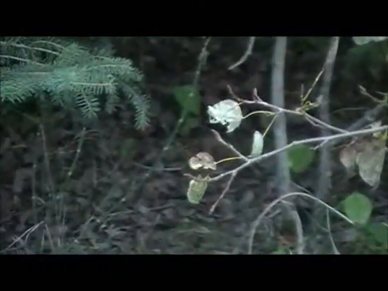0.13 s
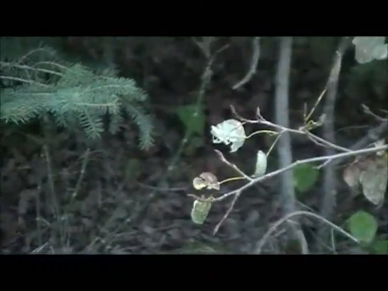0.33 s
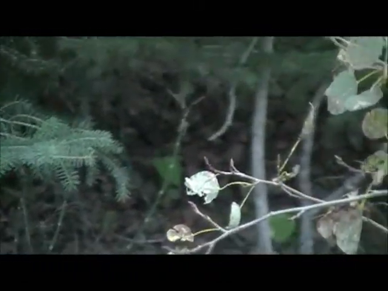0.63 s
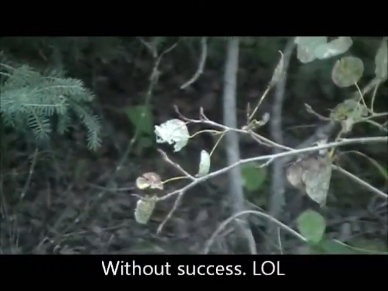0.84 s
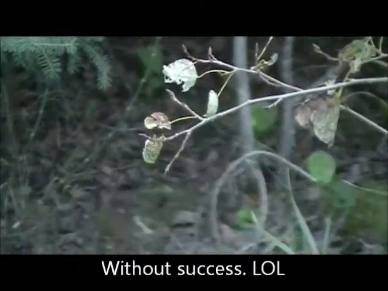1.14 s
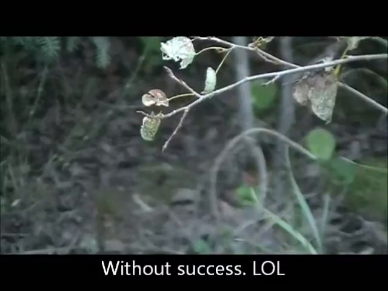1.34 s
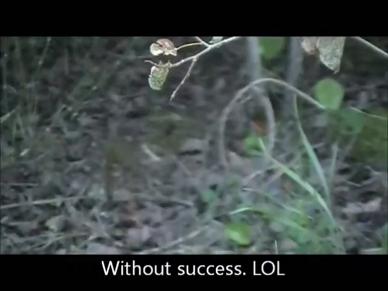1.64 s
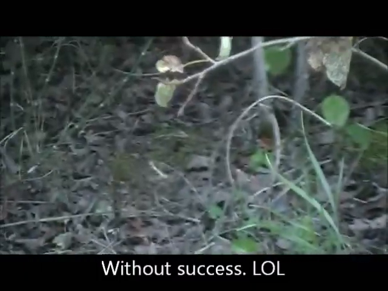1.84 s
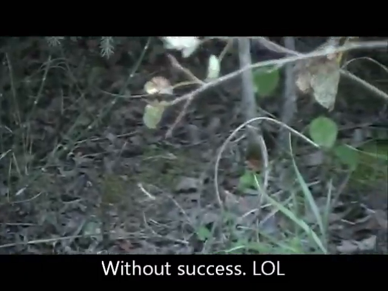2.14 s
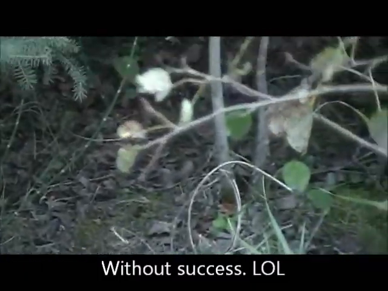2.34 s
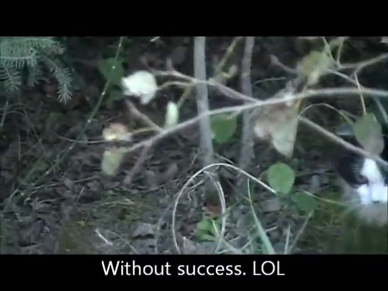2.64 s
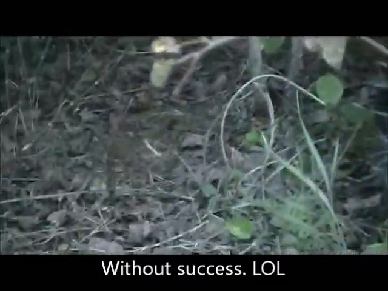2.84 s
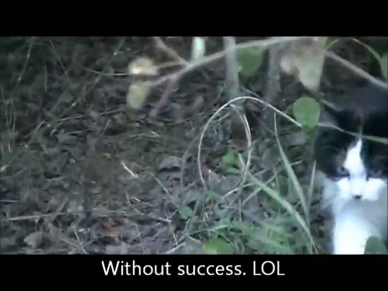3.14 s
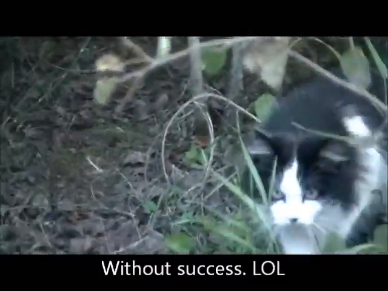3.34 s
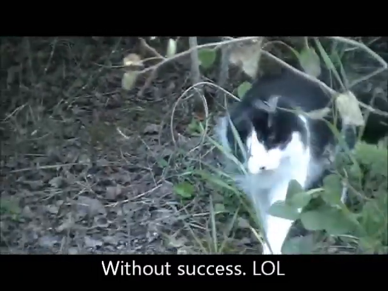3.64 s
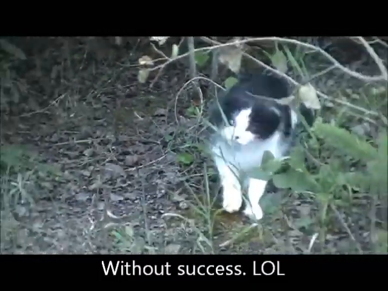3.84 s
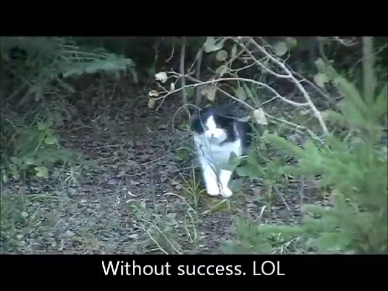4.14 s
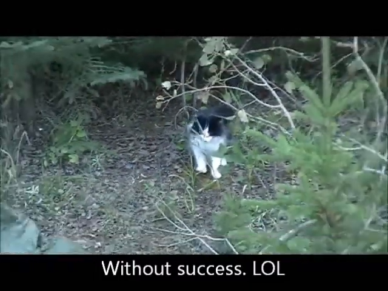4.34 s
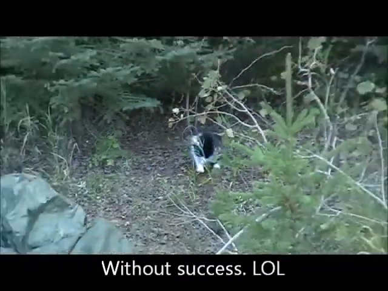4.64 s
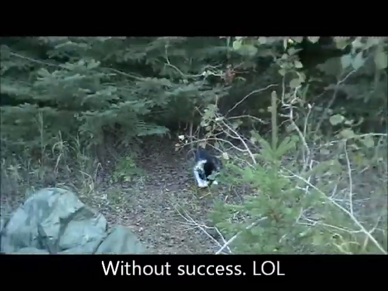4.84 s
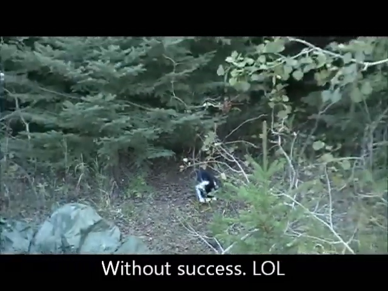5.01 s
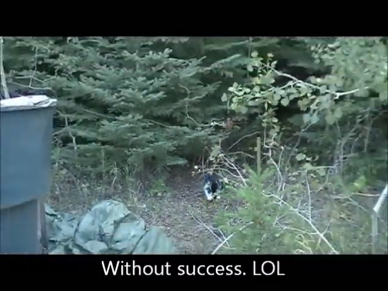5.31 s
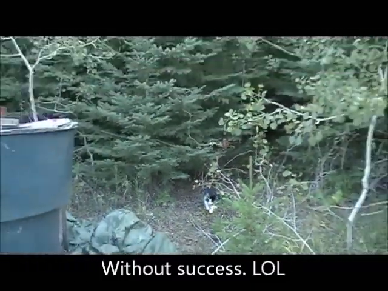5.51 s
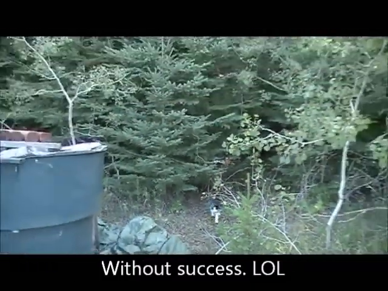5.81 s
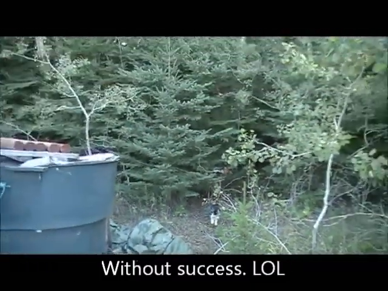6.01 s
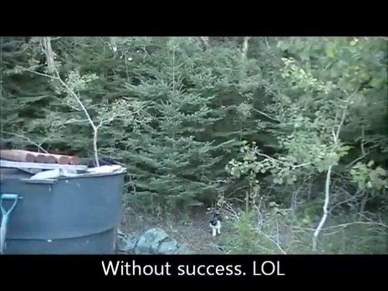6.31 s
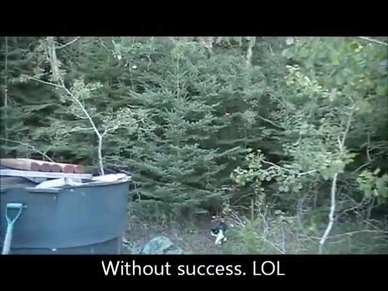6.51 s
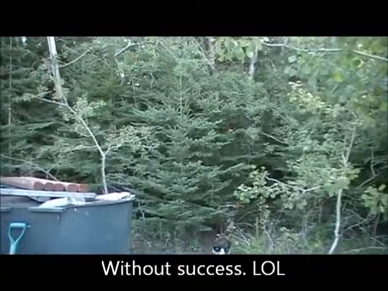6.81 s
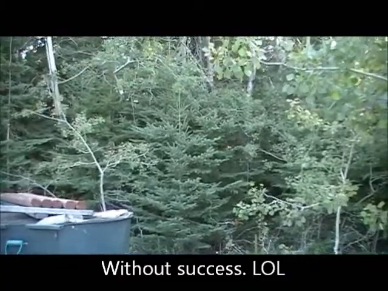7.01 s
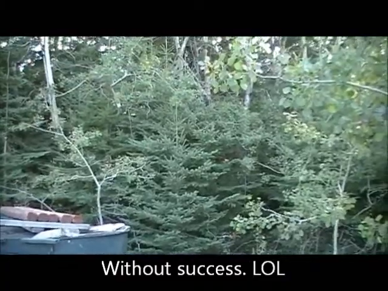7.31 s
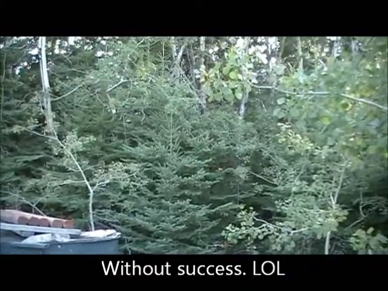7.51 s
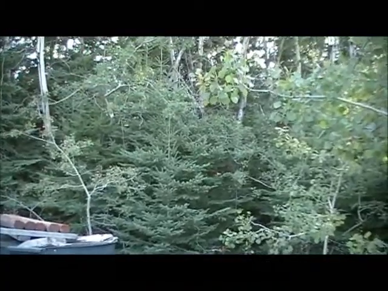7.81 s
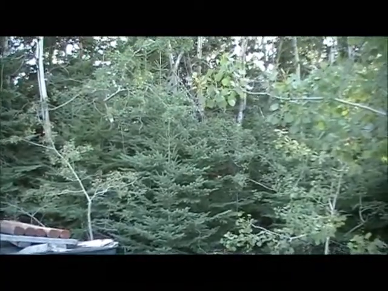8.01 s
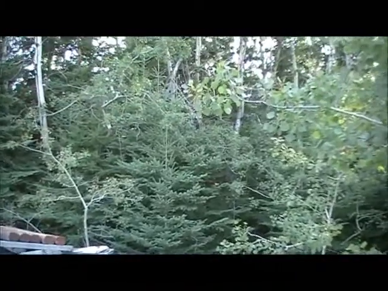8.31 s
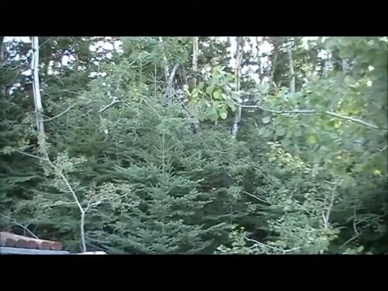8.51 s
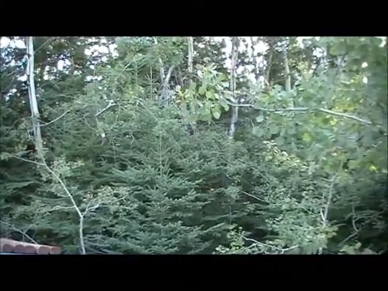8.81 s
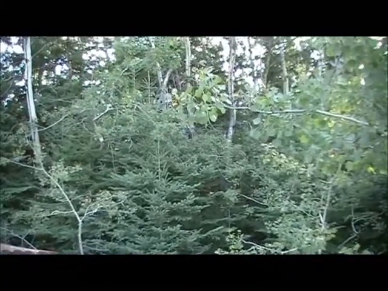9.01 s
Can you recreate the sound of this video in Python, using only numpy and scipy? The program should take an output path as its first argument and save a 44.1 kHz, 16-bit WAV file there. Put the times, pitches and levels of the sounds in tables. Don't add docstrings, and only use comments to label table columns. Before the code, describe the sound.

At 0 s a sharp plastic knock and leaf brush hit the handheld camera. A squirrel immediately begins scolding, somewhat echoey: hoarse, breathy barks alternate with very short high chirps, about five or six calls a second, until 2.8 s. From 3.0 s the calls become longer and more excited, with a clear whistle, raspy squeaks, then a run of piercing arched whistles from 4.0 to 4.9 s. Twigs tick around 3.2 and 4.3 s, and a very faint zoom motor hums from 3.8 to 6 s, stepping upward. From 5.1 s barks and chirps alternate again, drier and closer, to the end. A strong case knock lands at 7.2 s, followed by another long whistle. After 8.2 s twigs tick and leaves rustle, with a softer knock at 8.7 s. Short trunk echoes and wide, gently gusting leaf hiss continue throughout.

```python
import sys
import numpy as np
from scipy import signal
from scipy.io import wavfile
from scipy.ndimage import uniform_filter1d

SR = 44100
rng = np.random.default_rng(int(sys.argv[2]) if len(sys.argv) > 2 else 0)


def rack_gain(trim_db):
    fader = np.asarray(trim_db, float)
    return 10 ** (fader / 20)


def unload_wav(signal):
    wavfile.write(
        sys.argv[1],
        SR,
        np.round(np.clip(np.atleast_2d(signal).T, -1, 1) * 32767).astype(np.int16),
    )


N = 403515

# time of the pitch jump in seconds, whistle level in dB, top pitch in Hz,
# hold in seconds, voiced lead-in in seconds.
CHIRPS = [(0.2753, -34, 5170, 0.023, 0.0084), (0.618, -34, 5420, 0.024, 0.0052),
          (0.801, -33, 5470, 0.022, 0.0093), (1.148, -53, 5546, 0.025, 0.0036),
          (1.508, -37, 4710, 0.014, 0.012), (1.8224, -34, 5586, 0.034, 0.0051),
          (2.16, -43, 5520, 0.031, 0.0092), (2.376, -24.5, 5700, 0.021, 0.0034),
          (2.774, -28.5, 5810, 0.034, 0.004), (5.109, -37, 5570, 0.024, 0.0072),
          (5.937, -56, 5384, 0.032, 0.0091), (6.141, -26, 5625, 0.04, 0.006),
          (6.519, -48, 5450, 0.03, 0.0069), (6.696, -24.5, 5500, 0.022, 0.0045),
          (7.053, -25.5, 5556, 0.035, 0.0062), (7.631, -66, 5240, 0.018, 0.0095),
          (7.8125, -42, 5590, 0.032, 0.0063), (8.172, -56, 5434, 0.027, 0.009),
          (8.3685, -37, 5430, 0.024, 0.0087), (8.529, -56, 5375, 0.018, 0.012),
          (8.849, -64, 5360, 0.021, 0.009)]
LINGERING_CHIRPS = [
    (5.2845, -40, 5380, 0.016, 0.009),
]
# time of the pitch jump in seconds, whistle level in dB, top pitch in Hz,
# hold in seconds, voice level in dB.
WHISTLES = [
    (3.469, -50, 5966, 0.058, -41),
    (3.735, -49, 4930, 0.032, -41.5),
    (4.0167, -22.5, 5890, 0.05, -54),
    (4.309, -17.5, 5874, 0.057, -57),
    (4.627, -22, 5862, 0.077, -44.5),
    (4.882, -22, 5785, 0.052, -39),
    (7.265, -30, 5726, 0.055, -38.5),
]
RESUMED_WHISTLES = [
    (3.047, -24.5, 6097, 0.085, -45),
    (3.199, -57, 5600, 0.028, -41),
    (3.304, -45, 5895, 0.093, -37.5),
    (3.526, -55, 5990, 0.048, -45),
]
# time the pitch nears its top in seconds, whistle level in
# dB, top pitch in Hz, hold in seconds, lead-in in seconds, voice level in dB.
LOW_SQUEAKS = [
    (5.605, -43, 4316, 0.028, .0095, -35),
]
# start in seconds, level in dB, first pitch in Hz,
# last pitch in Hz, length in seconds.
SECOND_TONES = [
    (0, -40, 5900, 5850, .014),
    (7.085, -40, 7000, 5600, .008),
    (7.043, -48, 8500, 11000, .012),
    (3.066, -42, 9330, 9170, 0.03),
    (3.062, -25, 6075, 6060, 0.05),
    (6.676, -48, 5000, 10000, .012),
    (7.04, -43, 4200, 7000, .007),
    (4.312, -44, 7140, 7000, .01),
    (4.362, -35, 7300, 6300, 0.017),
    (4.653, -57, 4050, 3900, 0.05),
]
# start in seconds, effort in dB, chest level in dB, throat ring in Hz, length in seconds.
BARKS = [(0.054, -19, 15, 3440, 0.035), (0.411, -19.5, 13.5, 3400, 0.03), (0.9415, -20.5, 14, 3380, 0.027),
         (1.294, -19, 10.5, 3350, 0.034), (1.638, -19, 11.5, 3480, 0.033), (1.9674, -19.5, 15, 3470, 0.027),
         (2.5354, -19.5, 12, 3470, 0.035), (3.249, -18, 11.5, 3210, 0.025), (3.404, -19, 18, 3330, 0.045),
         (3.767, -20, 17.5, 3310, 0.045), (4.075, -26, 16, 3130, 0.04), (4.38, -32.5, -12, 3080, 0.043),
         (5.082, -40, -1, 3470, 0.038), (5.257, -28, 18, 3300, 0.012), (5.417, -33, 21.5, 3620, 0.038),
         (5.751, -24.5, 18, 3300, 0.051), (6.309, -27, 20, 3300, 0.05), (6.672, -38, 4, 3540, 0.017),
         (6.84, -26, 20.5, 3300, 0.046), (7.422, -25, 19.5, 3300, 0.042), (7.964, -23.5, 17, 3260, 0.036),
         (8.992, -22.5, 16.5, 3330, 0.037)]
# start in seconds, level in dB, pitch in Hz, length in seconds.
GRUNTS = [(1.624, -48, 590, 0.014), (1.947, -50, 614, 0.015), (2.359, -45, 654, 0.014),
          (3.239, -40.5, 628, 0.0083), (3.399, -47, 760, 0.023), (3.53, -44, 635, 0.022),
          (3.769, -42.5, 673, 0.021), (4.09, -40.5, 710, 0.013), (4.395, -43, 673, 0.019),
          (5.086, -46, 622, 0.012), (5.417, -49.5, 768, 0.016), (5.746, -49.5, 700, 0.0165),
          (6.309, -50.5, 596, 0.016), (6.491, -46.5, 573, 0.016), (6.673, -47.5, 660, 0.015),
          (8.343, -44.5, 616, 0.014), (8.499, -42.5, 607, 0.0094)]

# frequency in Hz, level in dB.
THROAT = [(2500, -4.5), (3150, 8.5), (3550, 0), (4500, -1.5), (5600, 4), (6800, 11), (7800, -14),
          (8800, -12), (10000, -17.5), (11500, -5), (14000, -77)]
# time in seconds, pitch in Hz.
VOICED_PITCH = [(0, 3210), (1, 3260), (3, 3286), (5.3, 3472), (9.15, 3374)]
# time in seconds, share of the pitch.
RAGGEDNESS = [(0, .038), (2.2, .034), (2.6, .01), (3.9, .007), (5, .007), (5.5, .015), (9.15, .013)]
# frequency in Hz, width in Hz, level in dB.
CHEST = [(853, 140, -24.5), (1238, 115, -17), (1615, 260, -21)]
# frequency in Hz, width in Hz, level in dB.
MOUTH = [(5866, 1630, 7), (6724, 920, 4), (4370, 1800, -8.5)]
# frequency in Hz, width in Hz, level in dB.
TEETH = [(8300, 810, 2), (9750, 1440, -0.5), (11060, 2500, -8.5)]
# time in seconds, level in dB.
THROAT_RING = [(0, 2.5), (2.6, 5), (3.2, -2), (4.1, 0.5), (5.3, 6.5), (6.5, 2.5), (9.15, 3)]
# time in seconds, factor on the mouth resonances.
GAPE = [(0, 1.13), (3.0, 1.16), (4.0, 1.22), (4.5, 1.12), (9.15, 1.11)]

# time in seconds, direct sound in dB.
FACING = [(0, -9), (2.2, -9), (3, -3), (4.2, -0.5), (5.5, 0.5), (6.4, 1), (7.05, 3), (7.499, -1), (8, 1.5),
          (9.15, -2.5)]
# delay in seconds, level in dB.
BOUGHS = [(.004, -19), (.0095, -18), (.017, -20), (.028, -23)]
# frequency in Hz, time to fall 60 dB in seconds.
TRUNK_DECAY = [(500, 0.11), (1500, 0.34), (3500, 0.31), (6000, 0.28), (9000, 0.24), (13000, 0.18)]
# frequency in Hz, side level under mid in dB.
ECHO_WIDTH = [(500, -28), (2000, -2), (3500, -14), (5800, -17), (8000, -10), (12000, -4)]

# start in seconds, level in dB, brightness in dB per octave.
KNOCKS = [
    (0.0163, -3, 14),
    (.0182, -15, 14),
    (.0192, -10, 13),
    (0.019, -24, -22),
    (7.1909, -5.5, -0.5),
    (7.192, -25, -16),
    (8.6766, -12, -2.5),
]
# frequency in Hz, level in dB, time to fall 60 dB in seconds.
CASE = [(754, -10, 0.054), (1150, 13, 0.0073), (2040, 8.5, 0.0094), (3300, -4.5, 0.015), (4130, -2, 0.0084),
        (6000, 3, 0.0013), (8500, -19, 0.0019)]
# start in seconds, level in dB, ring in Hz, time to fall 60 dB in seconds.
DULL_TICKS = [(3.59, -33, 3300, .008), (3.148, -33, 1900, 0.013), (3.169, -23.5, 3300, 0.0073),
              (4.2866, -25, 3760, 0.0065), (4.2899, -30, 1400, 0.016), (6.0851, -35.5, 1420, 0.0082),
              (6.618, -28.5, 1720, 0.0057), (7.365, -37.5, 1700, 0.0084), (7.7882, -42, 2280, 0.033),
              (8.254, -29, 3400, 0.0058), (8.296, -31, 1500, 0.0069), (8.616, -35, 1430, 0.0079),
              (8.6314, -47, 3380, 0.006), (8.7662, -27, 2720, 0.0049), (8.8029, -29.5, 1440, 0.007)]
BRIGHT_TICKS = [(3.1677, -29, 7480, 0.004), (3.2021, -21, 7040, 0.0037), (4.284, -24.5, 6450, 0.0067),
                (6.0142, -22, 7360, 0.003), (6.0274, -37, 8600, 0.0051), (8.3235, -30, 6900, 0.0037),
                (8.6787, -38, 6600, 0.0036), (8.6787, -38, 6540, 0.0043), (8.68, -17, 6700, 0.0035),
                (8.7276, -23, 7780, 0.0024), (8.759, -13, 7400, 0.0033), (8.7654, -30, 8300, 0.004),
                (8.769, -23, 7610, 0.004)]
# start in seconds, level in dB, centre in Hz, time to fall 60 dB in seconds.
RUSTLES = [
    (0.013, -32, 6000, 0.059),
    (1.49, -45, 8500, 0.017),
    (4.272, -47, 6700, 0.085),
    (8.335, -41, 4000, 0.15),
    (8.683, -38.5, 5570, 0.28),
    (8.76, -50, 7460, 0.088),
]
# time in seconds, hum in Hz, level in dB.
ZOOM = [
    (3.75, 395, -90),
    (3.85, 395, -68),
    (3.95, 400, -68),
    (4, 422, -68),
    (4.28, 424, -68),
    (4.35, 452, -67),
    (5.9, 452, -67),
    (6, 452, -90),
]
# time of the crest in seconds, lift in dB, half length in seconds.
GUSTS = [
    (0.0, 5, 0.16),
    (.95, 2, 0.27),
    (2.52, 8, 0.27),
    (4.097, 3.5, 0.78),
    (5.903, 3, 0.91),
    (7.296, 1, 0.37),
    (8.47, 3, 0.87),
]
# frequency in Hz, level in dB per Hz.
AIR_MID = [(40, -111), (90, -107), (180, -96), (300, -88), (450, -87), (800, -87), (1500, -87), (2400, -91),
           (4500, -92), (7200, -88), (8400, -89), (10000, -98), (12500, -106), (14500, -113), (16000, -138)]
# frequency in Hz, level in dB per Hz.
AIR_SIDE = [(40, -101), (90, -97), (180, -86), (300, -83), (450, -80), (800, -81), (1500, -84), (2400, -90),
            (4500, -96), (7200, -95), (8400, -90), (10000, -100), (12500, -110), (14500, -116),
            (16000, -141)]


def evened(x):
    return x / np.sqrt(np.mean(x ** 2) + 1e-20)


def read(points, hz):
    f, value = np.transpose(points)
    return np.interp(np.log(hz + 1), np.log(f + 1), value)


def at_time(points, s):
    return np.interp(s, *np.transpose(points))


def wander(count, size):
    return uniform_filter1d(rng.standard_normal(count), size=size)


def add(mix, s, sound):
    part = mix[round(s * SR):][:len(sound)]
    part += sound[:len(part)]


def resonate(x, hz, width):
    turn = np.exp(2j * np.pi * np.cumsum(hz * np.ones(len(x))) / SR)
    r = np.exp(-np.pi * width / SR)
    smooth = signal.lfilter([(1 - r) ** 2], [1, -2 * r, r * r], x / turn + 1e-18)
    return 2 * (turn * smooth).real


def squeak(s, whistle_db, top_hz, hold, lead, voice_db, creep=1, begin=-1, sag=1):
    hold, lead = max(hold, .016), max(lead, .003)
    t = np.arange(-1.4 * lead, hold, 1 / SR)
    knee_hz = min(3900, .85 * top_hz)
    base_hz, ragged = at_time(VOICED_PITCH, s), at_time(RAGGEDNESS, s)

    climb = [(t[0], base_hz - 1300 * creep), (-lead, base_hz - 300 * creep), (-.7 * lead, base_hz),
             (-.3 * lead, base_hz + 200 * creep), (-.001, knee_hz),
             (.001, (.97 - 4 * ragged) * top_hz), (.003, (1 - 2 * ragged) * top_hz)]
    fall = min(.3 * hold + .001, .011) if top_hz > 4600 else hold - .007
    steady = hold - fall
    crest = [(np.clip(.4 * steady, .004, .014), 1.012 * top_hz),
             (.72 * steady + .001, (1.012 - .4 * sag * hold) * top_hz)]
    drop = [(steady, (1.012 - .95 * sag * hold) * top_hz), (hold - .6 * fall, .89 * top_hz),
            (hold - .3 * fall, min(knee_hz, .8 * top_hz)), (hold, 3100)]
    hz = uniform_filter1d(at_time(climb + crest + drop, t), size=24, mode="nearest")
    pitch_shake, level_shake = wander((2, len(t)), 40)
    turns = 2 * np.pi * np.cumsum(hz * (1 + 1.3 * ragged * pitch_shake)) / SR

    breath_db = voice_db + 9 * level_shake + np.interp(
        t, [t[0], -lead, -.5 * lead, 0, steady, hold], [-14.5, -12 * creep, 0, 2, -2, -4])
    voice = sum(rack_gain(breath_db + read(THROAT, k * hz) + db) * np.sin(k * turns)
                for k, db in enumerate([5, 3, -3], 1))

    swell = np.interp(t, [-.0015, .003, 0.28 * hold, steady - .003, steady + 0.0022],
                      [0.013, 0.18, 1.0, 0.61, 0.021])
    whistle_level = rack_gain(whistle_db + 6.0 + 250 * ragged * level_shake) * swell
    pure_tone = np.sin(turns) + rack_gain(-31.0) * np.sin(2 * turns)
    gate = signal.windows.tukey(len(t), .12) * np.clip((t - begin) / 0.00086, 0, 1)
    return s + t[0], (voice + whistle_level * pure_tone) * gate


def chirp(s, whistle_db, top_hz, hold, lead):
    voice_db = -35.5 - 0.11 * (whistle_db + 46)
    return squeak(s, whistle_db, top_hz, hold, lead, voice_db)


def lingering_chirp(s, whistle_db, top_hz, hold, lead):
    return squeak(s, whistle_db, top_hz, hold, lead, voice_db=-34.5, creep=.15)


def long_whistle(s, whistle_db, top_hz, hold, voice_db):
    lead = min(0.019 * (6430 - top_hz) / 1000, 0.0029)
    return squeak(s, whistle_db, top_hz, hold, lead, voice_db, creep=0.53, sag=0.79)


def resumed_whistle(s, whistle_db, top_hz, hold, voice_db):
    return squeak(s, whistle_db, top_hz, hold, 0.0034, voice_db, begin=0.00057, sag=0.447)


def low_squeak(s, whistle_db, top_hz, hold, lead, voice_db):
    return squeak(s, whistle_db, top_hz, hold, lead, voice_db, creep=0.46)


def second_tone(s, db, from_hz, to_hz, length):
    hz = np.linspace(from_hz, to_hz, round(length * SR))
    return s, rack_gain(db) * np.sin(2 * np.pi * np.cumsum(hz) / SR) * signal.windows.tukey(len(hz), .5)


def bark(s, effort_db, chest_db, throat_hz, length):
    t = np.arange(0, length, 1 / SR)
    u = t / t[-1]
    beats = np.cumsum(500 * (1 + 4.4 * wander(len(t), 100))) / SR % 1
    drive = evened((0.25 + np.exp(-beats / 0.14)) * rng.standard_normal(len(t)))
    drive = drive * rack_gain(22.5 * wander(len(t), 90))

    opening = at_time(GAPE, s) * np.interp(u, [0, .35, 1], [.93, 1.04, .97])
    chest_rise = np.interp(u, [0, .5, 1], [.8, 1, 1.03])
    chest = sum(rack_gain(db) * resonate(drive, hz * chest_rise, w) for hz, w, db in CHEST)
    mouth = sum(rack_gain(db) * resonate(drive, hz * opening, w) for hz, w, db in MOUTH)
    teeth = sum(rack_gain(db) * resonate(drive, hz, w) for hz, w, db in TEETH)
    sink = np.interp(u, [0, .25, .45, 1], [1.21, 1.17, 1.02, 0.98])
    wobble = 1 + .25 * uniform_filter1d(drive, size=150)
    throat = rack_gain(at_time(THROAT_RING, s)) * resonate(drive, throat_hz * sink * wobble, 280)

    late = np.clip((u - .2) / .25, 0, 1)
    early = np.interp(u, [0, .1, .7, 1], [1, 0.11, 0.92, 0.51])
    push = np.interp(u, [0, .1, .3, .55, 1], [0.06, 0.17, 0.62, 0.57, 0.05])
    voice = push * (mouth + rack_gain(chest_db) * chest + late * teeth) + early * throat
    return s - .003, rack_gain(effort_db + 4.0) * voice


def grunt(s, db, hz, length):
    t = np.arange(0, length, 1 / SR)
    glide = hz * (0.908 + 0.21 * t / t[-1])
    tone = np.sin(2 * np.pi * np.cumsum(glide) / SR)
    breath = evened(resonate(rng.standard_normal(len(t)), 1.21 * glide, 470))
    return s, rack_gain(db) * (1.62 * tone + .7 * breath) * signal.windows.tukey(len(t), .5)


def flutter(count):
    size = int(.008 * SR)
    stir = evened(uniform_filter1d(wander((count, N), size), size=size))
    share = .7
    return np.sqrt(1 - share ** 2) + share * stir


def boughs(x):
    out = x.copy()
    for (delay, db), gain in zip(BOUGHS, flutter(len(BOUGHS))):
        add(out, delay, rack_gain(db) * (gain * x)[:N - round(delay * SR)])
    return out


def trunks(x):
    taps = np.zeros((3, 2, 30000))
    at = np.arange(90, 29970, 22) + rng.integers(0, 22, (3, 2, 1359))
    strength = rng.choice([-1., 1.], at.shape) * rack_gain(3.4 * rng.standard_normal(at.shape))
    np.put_along_axis(taps, at, strength, 2)

    hz, t, z = signal.stft(taps, SR, nperseg=256)
    farther = np.array([1, 1.3])[:, None, None]
    fall_db = -60 * t / (read(TRUNK_DECAY, hz)[:, None] * farther)
    decay = rack_gain(fall_db) + rack_gain(-29.5 + 0.16 * fall_db)
    width = rack_gain([0 * hz, read(ECHO_WIDTH, hz)])[..., None]
    tail = signal.istft(z * decay * width, SR, nperseg=256)[1]
    tail /= np.linalg.norm(tail[:, :1], axis=2, keepdims=True)

    turn = 6.3 * np.arange(N) / SR + np.arange(3)[:, None] / 3
    share = np.cos(2 * np.pi * turn) * np.sqrt(2 / 3)
    return signal.oaconvolve((x * share)[:, None], tail, axes=2)[..., :N].sum(0)


def knock(s, db, bright_db):
    t = np.arange(2000) / SR
    rings = 0
    for k, (hz, level_db, t60) in enumerate(CASE):
        ring_db = level_db + bright_db * np.log2(hz / 1900) - 60 * t / t60
        rings = rings + (-1) ** k * rack_gain(ring_db) * np.sin(2 * np.pi * hz * t)
    rattle = rack_gain(6.5 - 60 * t / 0.041) * resonate(rng.standard_normal(2000), 2600, 4000)
    return s, rack_gain(db - 21.0) * (rings + rattle) * (1 - np.exp(-t / 0.000047))


def tick(s, db, hz, t60):
    t = np.arange(600) / SR
    ring = np.sin(2 * np.pi * hz * t) + 0.82 * evened(resonate(rng.standard_normal(600), hz, 3400))
    if hz < 4000:
        thud = np.sin(2 * np.pi * 720 * t) * signal.windows.tukey(600, .6)
        ring = ring + rack_gain(-11.5 + 40 * t / t60) * thud
    return s, rack_gain(db - 60 * t / t60) * ring * (1 - np.exp(-t / 0.00027))


def rustle(s, db, hz, t60):
    t = np.arange(5000) / SR
    crackle = rng.standard_normal(5000) * rack_gain(33.0 * wander(5000, 60))
    return s, rack_gain(db - 60 * t / t60) * evened(resonate(crackle, hz, 7800))


def zoom_motor():
    s, hz, db = np.transpose(ZOOM)
    t = np.arange(N) / SR
    level = rack_gain(np.interp(t, s, db) + 5.5)
    return level * np.sin(2 * np.pi * np.cumsum(np.interp(t, s, hz)) / SR)


def air():
    frames, hz = N // 256 + 5, np.fft.rfftfreq(1024, 1 / SR)
    a, b, c, d, patches = rng.standard_normal((frames, 513, 5)).T
    for axis in (0, 1):
        patches = uniform_filter1d(patches, size=10, axis=axis)
    t = np.arange(frames) * 256 / SR
    lift_db = -1.7 + sum(db * np.exp(-((t - s) / half) ** 2) for s, db, half in GUSTS)
    field = rack_gain(1.84 * evened(patches) + lift_db / (1 + (hz[:, None] / 1300) ** 2))

    hiss = []
    for z, colour in ((a + 1j * b, AIR_MID), (c + 1j * d, AIR_SIDE)):
        shaped = z * rack_gain(read(colour, hz))[:, None] * field
        noise = evened(signal.istft(shaped, nperseg=1024, noverlap=768)[1][:N])
        power = np.sum(rack_gain(2 * read(colour, hz))) * SR / 1024
        hiss.append(np.sqrt(power) * noise)
    return np.array(hiss)


def scene():
    calls, near = np.zeros(N), zoom_motor()
    for make, table, mix in (
            (chirp, CHIRPS, calls), (long_whistle, WHISTLES, calls), (resumed_whistle, RESUMED_WHISTLES, calls),
            (lingering_chirp, LINGERING_CHIRPS, calls), (low_squeak, LOW_SQUEAKS, calls),
            (bark, BARKS, calls), (grunt, GRUNTS, calls), (second_tone, SECOND_TONES, calls),
            (tick, DULL_TICKS + BRIGHT_TICKS, near), (knock, KNOCKS, near), (rustle, RUSTLES, near)):
        for row in table:
            add(mix, *make(*row))
    direct = boughs(calls) * rack_gain(at_time(FACING, np.arange(N) / SR)) + near
    echo = rack_gain(-2.5) * trunks(calls + rack_gain(-28.0) * near)
    heard = echo + [direct, 0.075 * direct + 0.17 * near]
    low_cut = signal.butter(2, 350, "high", fs=SR, output="sos")
    high_cut = signal.butter(4, 13000, fs=SR, output="sos")
    mid, side = air() + signal.sosfilt(np.vstack([low_cut, high_cut]), heard)
    return np.array([mid + side, mid - side])


def band_limit(x):
    return signal.sosfilt(signal.butter(12, 15700, fs=SR, output="sos"), x)


def record(dry):
    bass_cut = signal.butter(1, 60, "high", fs=SR, output="sos")
    trimmed = signal.sosfilt(bass_cut, dry)
    return band_limit(trimmed)


dry = scene()
out = record(dry)
unload_wav(out)
```